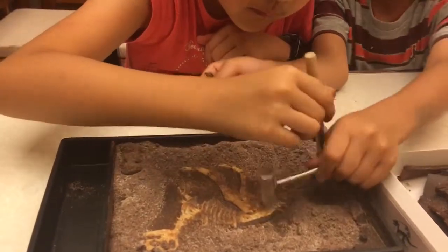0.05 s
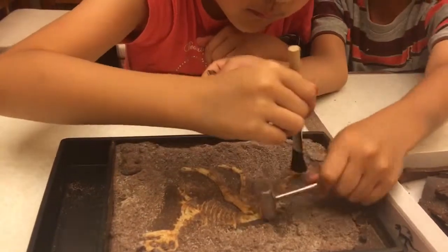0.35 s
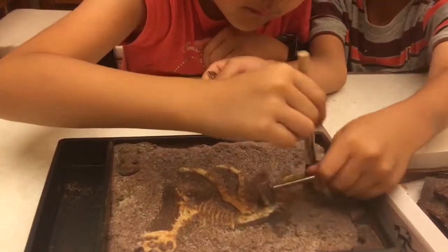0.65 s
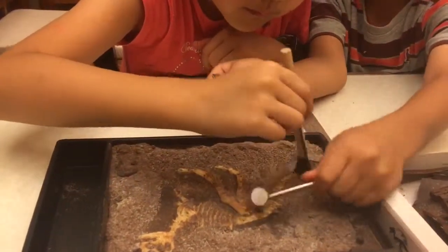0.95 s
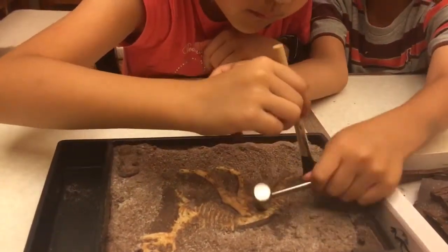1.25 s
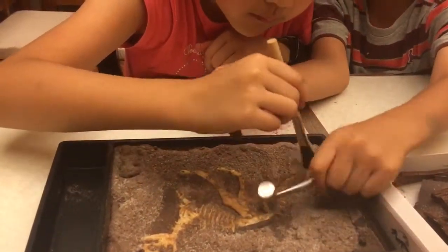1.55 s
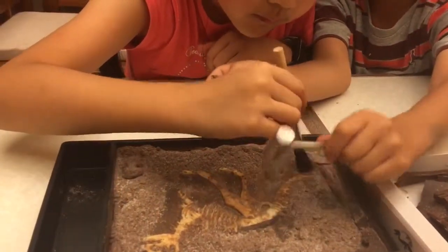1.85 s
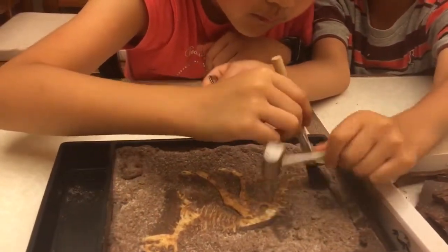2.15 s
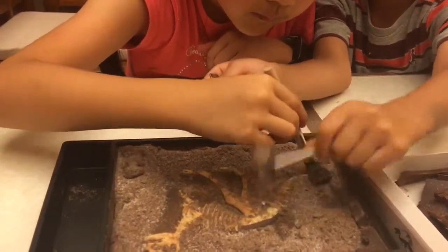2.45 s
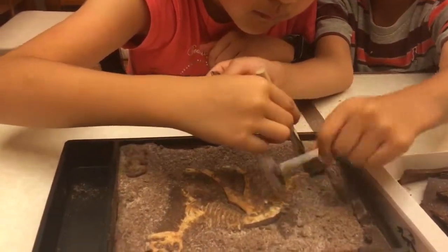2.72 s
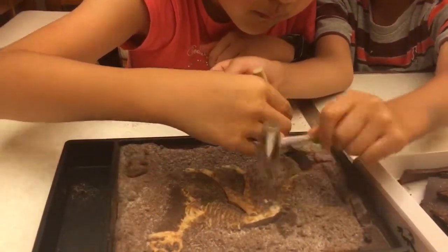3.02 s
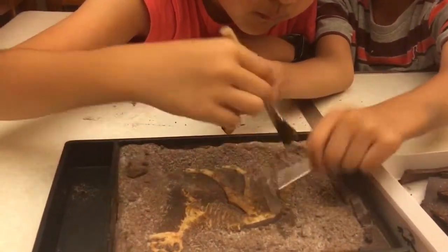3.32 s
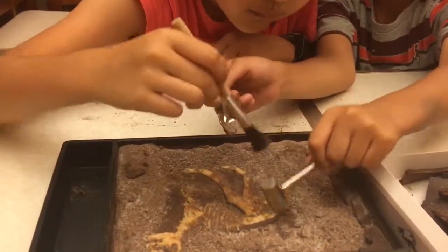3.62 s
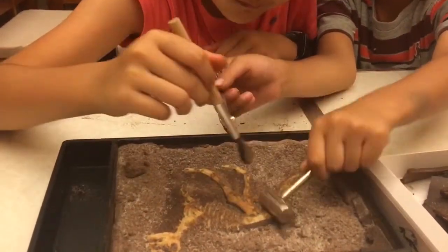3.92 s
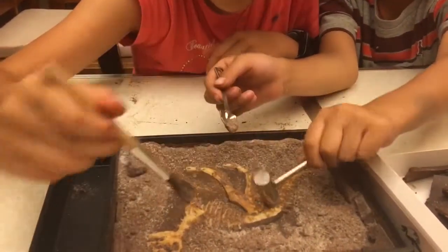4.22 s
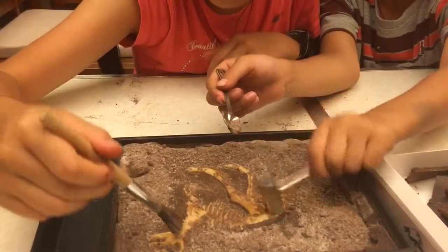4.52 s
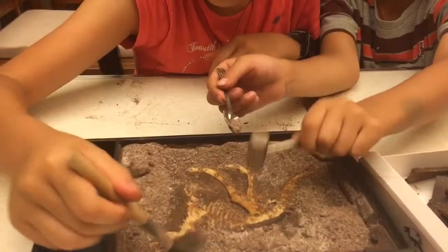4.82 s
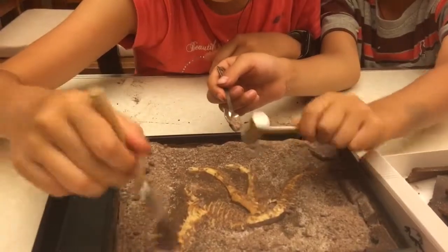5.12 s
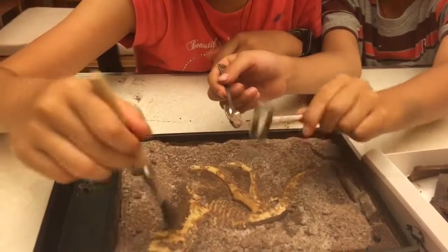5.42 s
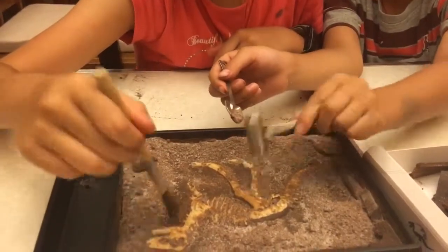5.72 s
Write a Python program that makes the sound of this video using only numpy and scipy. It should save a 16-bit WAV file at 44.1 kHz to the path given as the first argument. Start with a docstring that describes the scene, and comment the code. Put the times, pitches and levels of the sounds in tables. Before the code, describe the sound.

In a small room with a faint appliance hum, a little hammer knocks evenly on a crumbly block, heard close by. Short scrapes and crisp ticks from another tool fall between the first, lighter blows. The hammering then strengthens, eases briefly and firms up again, each blow giving a dull table thud, a slight crunch and a short, hollow ring from the plastic tray.

```python
"""Hammer on a crumbly block

A small steel hammer taps a hard, crumbly block in a plastic tray on a table, about three times a second.
Each impact thuds through the table, makes the block chatter and leaves the tray's modes ringing in a
small room. Mostly early on, a second tool scrapes and ticks over the grit by friction and fracture.
A faint hum and room air lie underneath."""
import sys
import numpy as np
from scipy import signal
from scipy.fft import rfft, irfft, next_fast_len
from scipy.io import wavfile

SR = 44100
rng = np.random.default_rng(int(sys.argv[2]) if len(sys.argv) > 2 else 0)


def transcribe(u):
    """Save the signal u as a 16-bit wav file named by the first command-line argument.

    u: samples, shape (n,) or (channels, n), limited to [-1, 1]; the rate is SR.
    q: integer samples, one column per channel.
    """
    v = np.clip(np.atleast_2d(u).T, -1, 1)
    q = np.round(v * 32767).astype(np.int16)
    wavfile.write(sys.argv[1], SR, q)


N = 258293
TIME = np.arange(N) / SR
AFTER = TIME[:SR // 2]  # seconds since a contact

# Spectrum of the room air. Each row: frequency in Hz, gain in dB.
AIR_SPECTRUM = [(20, -43), (40, -2.5), (62, -0.5), (95, -1.5), (175, -6), (300, -7.5), (420, -12.5),
                (700, -15.5), (1050, -13), (1900, -16.5), (2900, -24.5), (5000, -30), (9500, -37.5),
                (16000, -51.5)]
# Partials of an appliance's hum. Each row: frequency in Hz, level in dB.
HUM_PARTIALS = [(118.4, -58), (560, -73), (990.5, -72), (1114, -70)]
# Strokes of the second tool. Each row: start in seconds, length in seconds, hiss level in dB.
STROKES = [(0.132, 0.049, -52), (0.697, 0.04, -59), (0.831, 0.067, -42.5), (0.923, 0.057, -55),
           (1.06, 0.037, -50), (1.934, 0.0074, -57), (3.303, 0.32, -58), (5.178, 0.062, -66)]
# Spectra of loose grit and of the room's reflections. Each row: frequency in Hz, gain in dB.
GRIT_SPECTRUM = [(800, -16), (2500, -20), (4000, 7), (5000, -2.5), (6300, 8), (8000, 3.5), (9600, 7.5),
                 (10500, 3), (11800, 6), (14000, -3), (16000, -12)]
ROOM_SPECTRUM = [(100, -2.5), (600, 0.5), (1100, 2.5), (2200, -2.5), (4500, -4), (9000, -8.5), (15000, -13)]
# Hammer blows. Each row: start in seconds, force in dB, hardness of the struck spot in dB,
# tray frequency that the spot favours in Hz, how freely the tray rings there in dB.
HAMMER_BLOWS = [(0.2172, -24, 1, 172, 4), (0.4086, -24, -2.5, 204, -1.5), (0.6798, -24, -1.5, 185, 2),
                (0.981, -20, 4.5, 211, -2), (1.2881, -19, 3.5, 205, -2), (1.6382, -16, 1.5, 195, -1),
                (2.0314, -16.5, -2, 202, 0), (2.392, -17, -3, 216, -.5), (2.707, -17.5, 2, 206, 0),
                (2.9578, -15.5, -.5, 215, 2), (3.192, -14.5, -0.5, 232, 1), (3.421, -19, 2, 181, 1.5),
                (3.6845, -16.5, 1.5, 214, 0.5), (3.9882, -19, 1, 197, 0.5), (4.269, -23, -1, 180, -0.5),
                (4.6146, -22, 2, 169, 1), (4.969, -21.5, -1, 173.4, 3), (5.304, -17, -1, 177.5, -.5),
                (5.5976, -16.5, -2.5, 173, 0.5)]
# Modes of the table and of the tray. Each row: frequency in Hz, relative level in dB, t60 in seconds.
TABLE_MODES = [(57.6, -10.5, 0.13), (405, -4, 0.025), (890, -10, 0.0077)]
TRAY_MODES = [(77, -20, 0.69), (140.4, -3, 0.21), (165.8, -1, 0.23), (181.9, -6, 0.37), (216.2, 1.5, 0.2),
              (246.8, 0, 0.23), (283.7, -6.5, 0.52), (312.7, 0.5, 0.33), (347.4, -2.5, 0.17),
              (471, -16.5, 0.44), (535, -11, 0.23), (599, -15, 0.25), (682, -16, 0.4), (796, -31, 0.54),
              (913, -17, 0.14), (1216, -23, 0.25), (1714, -14.5, 0.22)]
# Heavily damped modes of the block. Each entry: frequency in Hz.
BLOCK_MODES = [406, 870, 1682]
# Spectra of the block chattering and of its surface crushing. Each row: frequency in Hz, gain in dB.
CHATTER_SPECTRUM = [(170, -27), (400, 1.5), (620, -3), (850, 4), (1150, -1), (1700, -2.5), (2400, -3),
                    (3400, -13), (4600, -27.5), (9000, -62)]
CRUNCH_SPECTRUM = [(1500, -22), (3500, 3.5), (4500, 0), (6500, -2.5), (9000, -5.5), (10500, -14.5),
                   (13000, -13.5), (16000, -26)]
# Scuffs of steel on steel. Each row: start in seconds, relative level in dB.
STEEL_SCUFFS = [(.263, -59.5), (.370, -55.5)]
# Thin spectrum of those scuffs. Each row: frequency in Hz, gain in dB.
STEEL_SPECTRUM = [(3000, -12), (7000, -7), (8200, -12), (10500, -12), (11700, 0), (12300, -10), (12900, -2),
                  (14000, -20)]
# Grains snapping under the second tool. Each row: start in seconds, level in dB.
GRIT_SNAPS = [(.47, -62.5), (.837, -42.5), (.861, -43.5), (1.0532, -50), (1.065, -44), (1.08, -46),
              (1.4267, -51.5), (1.441, -56.5), (1.825, -63.5), (1.936, -66)]

USUAL_FORCE_DB, USUAL_SPOT_HZ = -19, 197.5  # an ordinary blow
KNOCK_DB, CHATTER_DB, CRUNCH_DB, RING_DB, CRUMBS_DB = -34.5, -25.5, -37.5, -24.5, -61.5  # its levels


def undb(db):
    """Amplitude ratio for a level in decibels."""
    return 10 ** (np.asarray(db) / 20)


def add_burst(track, start, sound, db):
    """Mix in a sound at start seconds, scaled so that its energy, spread over 10 ms, has level db."""
    power = np.sum(sound ** 2) / (0.01 * SR) + 1e-18
    first = int(start * SR)
    track[first:first + len(sound)] += sound[:N - first] * undb(db) / np.sqrt(power)


def colour(x, spectrum):
    """Minimum-phase filtering: folding the cepstrum makes the given response causal."""
    hz, db = np.transpose(spectrum)
    n = 2 * next_fast_len(len(x))
    bin_hz = np.maximum(np.arange(n // 2 + 1) * SR / n, 1)
    gain = undb(np.interp(np.log(bin_hz), np.log(hz), db))
    cepstrum = irfft(np.log(gain))
    cepstrum[1:n // 2] *= 2
    cepstrum[n // 2 + 1:] = 0
    return irfft(rfft(x, n) * np.exp(rfft(cepstrum)))[:len(x)]


def fade(t60):
    """Exponential decay, by 60 dB in t60 seconds."""
    return np.exp(-np.log(1000) * AFTER / t60)


def rise(tau):
    """Exponential approach to 1, with a time constant of tau seconds."""
    return 1 - np.exp(-AFTER / tau)


def mode(hz, t60):
    """Free vibration of a damped oscillator."""
    return fade(t60) * np.sin(2 * np.pi * hz * AFTER)


def modes(hz, gain, t60):
    """Superposition of damped modes."""
    return sum(g * mode(f, d) for f, g, d in zip(hz, gain, t60))


def grains(rate):
    """Shot noise: tiny impacts of random size, on average rate a second."""
    return (rng.random(len(AFTER)) < rate / SR) * rng.standard_normal(len(AFTER))


def waver(rate):
    """Slow drift through rate random values a second."""
    knots = rng.standard_normal(N // 100)
    return np.interp(TIME * rate, np.arange(len(knots)), knots)


def room(x, wet_db, t60):
    """Reverberation: the direct sound plus a diffuse field, noise that follows its energy and decays."""
    decay = (np.clip((AFTER - 0.003) / 0.0032, 0, 1) * fade(t60)) ** 2
    energy = np.abs(signal.fftconvolve(x ** 2, decay / decay.sum())[:len(x)])
    diffuse = np.sqrt(energy) * rng.standard_normal(len(x))
    return x + undb(wet_db) * colour(diffuse, ROOM_SPECTRUM)


def room_air(level_db):
    """Stationary broadband noise, strongest in the bass."""
    air = colour(rng.standard_normal(N), AIR_SPECTRUM)
    return air / np.std(air) * undb(level_db)


def hum():
    """An appliance hums in partials with slight random amplitude and phase modulation."""
    out = np.zeros(N)
    for hz, db in HUM_PARTIALS:
        amplitude = np.sqrt(2) * undb(db + 0.5 * waver(rate=9.3))
        out += amplitude * np.sin(2 * np.pi * hz * TIME + 0.5 * waver(rate=3.25))
    return out


def scrapes():
    """Sliding friction: the second tool's tiny collisions excite both the grit and the block."""
    out = np.zeros(N)
    firmest_db = max(db for _, _, db in STROKES)
    for start, length, hiss_db in STROKES:
        rub_db = -43.5 + 0.75 * (hiss_db - firmest_db)  # the block's rub falls more slowly than the hiss
        arch = np.sin(np.pi * np.minimum(AFTER / length, 1))
        stroke = np.sqrt(np.maximum(arch, 0))
        friction = room(grains(rate=1300) * stroke, wet_db=0, t60=0.17)
        add_burst(out, start, colour(friction, GRIT_SPECTRUM), hiss_db)
        add_burst(out, start, colour(friction, CHATTER_SPECTRUM), rub_db)
    return out


def thud(bounce_hz, tight_db):
    """Impulse response of table, bouncing block and tray floor; tightness trades bounce for drumming."""
    hz, db, t60 = np.transpose(TABLE_MODES)
    detune = 1 + 0.05 * rng.standard_normal(len(hz))
    direction = -(-1) ** np.arange(len(hz))  # neighbouring modes start in antiphase
    table = modes(hz * detune, direction * undb(db), t60)
    bounce = undb(-0.35 * tight_db) * mode(bounce_hz, t60=0.045)
    drum = undb(1 + 0.52 * tight_db) * mode(hz=244.5, t60=0.044)
    return table + bounce - drum


def knock(force_db):
    """Contact time selects the block's modes: a stronger blow is shorter and favours higher ones."""
    contact_hz = 911.5 * 2 ** (0.6 * force_db)
    octaves_off = np.log2(np.array(BLOCK_MODES) / contact_hz)
    gains = np.exp(-(octaves_off / 0.75) ** 2)
    return rise(0.0017) * sum(g * mode(hz, t60=0.033) for hz, g in zip(BLOCK_MODES, gains))


def contact(attack, hold, linger_db, linger_t60):
    """Contact force: it builds, lets go after hold seconds and leaves a decay as crumbs settle."""
    release = 1 / (1 + (AFTER / hold) ** 10)
    return rise(attack) * (release + undb(linger_db) * fade(linger_t60))


def chatter():
    """Intermittent contact: the block strikes the tray in a dense run of tiny impacts."""
    taps = grains(rate=4500) * contact(attack=0.0014, hold=0.0099, linger_db=6, linger_t60=0.066)
    return colour(room(taps, wet_db=-7, t60=0.33), CHATTER_SPECTRUM)


def crunch():
    """Brittle fracture: the block's surface crushes in a burst of bright clicks."""
    cracks = grains(rate=6400) * contact(attack=0.0025, hold=0.0091, linger_db=1, linger_t60=0.07)
    return colour(room(cracks, wet_db=-6, t60=0.4), CRUNCH_SPECTRUM)


def tray_ring(spot_hz, impact_db):
    """Modal ringing: the struck spot favours modes near spot_hz, and hard impacts the upper modes."""
    hz, db, t60 = np.transpose(TRAY_MODES)
    favour_db = 8 * np.exp(-((hz - spot_hz) / 13) ** 2)
    tilt_db = 0.19 * impact_db * np.clip(np.log2(hz / 190), -0.5, 0.8)
    level_scatter, pitch_scatter = rng.standard_normal((2, len(hz)))
    gains = undb(db + favour_db + tilt_db + 3.16 * level_scatter)
    return rise(0.0039) * modes(hz * (1 + 0.0026 * pitch_scatter), gains, t60)


def crumbs():
    """Secondary impacts: loose crumbs patter sparsely after a blow."""
    return colour(grains(rate=170) * rise(0.012) * fade(0.16), GRIT_SPECTRUM)


def hammer():
    """Impact excitation: the force of each blow and the spot it strikes set the level of each response."""
    out = np.zeros(N)
    for start, blow_db, hard_db, spot_hz, free_db in HAMMER_BLOWS:
        force_db = blow_db - USUAL_FORCE_DB
        impact_db = force_db + hard_db
        # the bounce is slower after a strong blow, and where the spot favours higher tray modes
        bounce_hz = 117.4 * 2 ** (-0.04 * force_db) * (spot_hz / USUAL_SPOT_HZ) ** -1.32
        # the thud tightens as the work goes on, and is looser on hard spots
        tight_db = -5 + 1.83 * start - 0.44 * hard_db
        ring_db = RING_DB + 0.72 * force_db + 0.22 * hard_db + free_db
        add_burst(out, start, thud(bounce_hz, tight_db), blow_db)
        add_burst(out, start, knock(force_db), KNOCK_DB + impact_db)
        add_burst(out, start, chatter(), CHATTER_DB + impact_db)
        add_burst(out, start, crunch(), CRUNCH_DB + 1.46 * force_db + 0.54 * hard_db)
        add_burst(out, start, tray_ring(spot_hz, impact_db), ring_db)
        add_burst(out, start, crumbs(), CRUMBS_DB + impact_db)
    return out


def scuffs():
    """Friction of steel on steel gives a faint, thin hiss that decays in two stages."""
    out = np.zeros(N)
    for start, db in STEEL_SCUFFS:
        friction = grains(rate=7700) * (fade(0.016) + undb(1) * fade(0.26))
        add_burst(out, start, colour(friction, STEEL_SPECTRUM), db + 3)
    return out


def grit_ticks():
    """Brittle fracture of larger grains: each snaps under the second tool with a tick."""
    out = np.zeros(N)
    for start, db in GRIT_SNAPS:
        snap = grains(rate=14000) * (fade(0.0045) + undb(-5) * fade(0.024))
        add_burst(out, start, colour(room(snap, wet_db=-5, t60=0.47), GRIT_SPECTRUM), db)
    return out


def scene():
    """Superposition of the quiet room, the hammer and the second tool in one channel."""
    return (room_air(level_db=-52.5) + hum() + scrapes() + hammer() + scuffs() + grit_ticks())[None]


def record(dry):
    """Band limiting thins the bass below 32 Hz and cuts the treble above 16 kHz."""
    highpass = signal.butter(2, 32, "high", fs=SR, output="sos")
    lowpass = signal.ellip(8, 0.2, 70, 16000, fs=SR, output="sos")
    return signal.sosfilt(lowpass, signal.sosfilt(highpass, dry))


dry = scene()
out = record(dry)
transcribe(out)
```